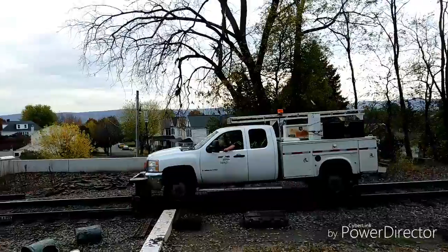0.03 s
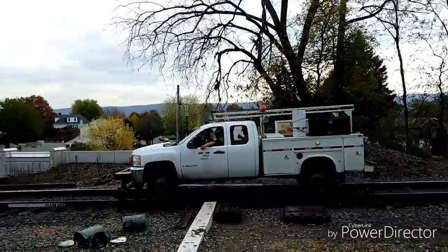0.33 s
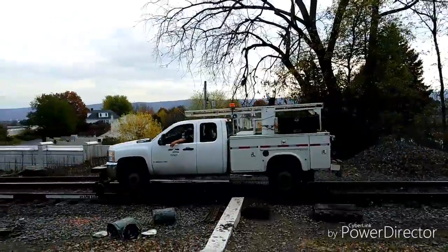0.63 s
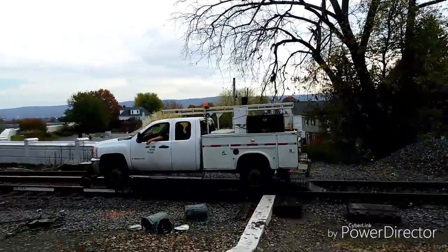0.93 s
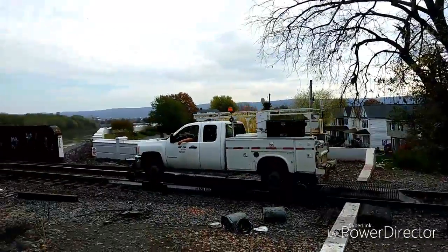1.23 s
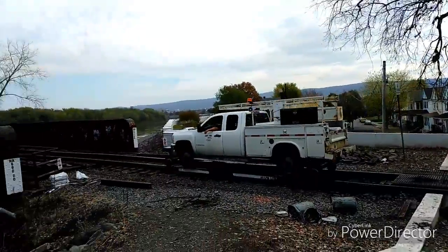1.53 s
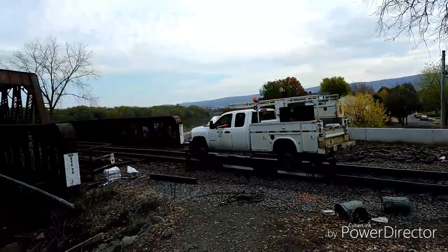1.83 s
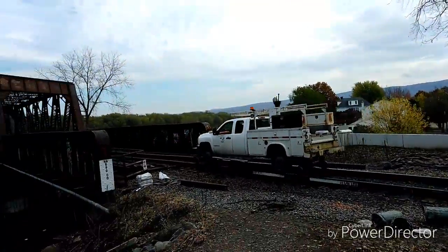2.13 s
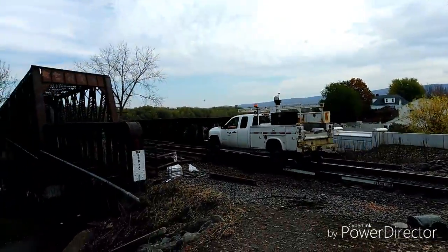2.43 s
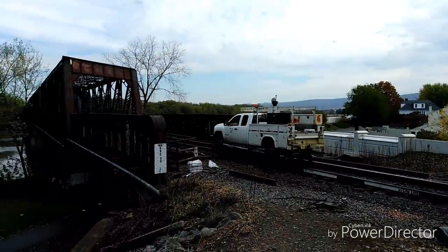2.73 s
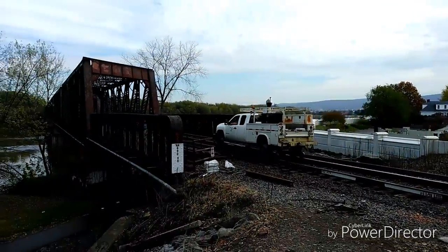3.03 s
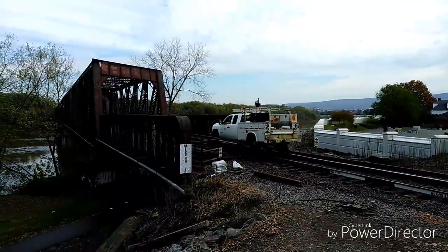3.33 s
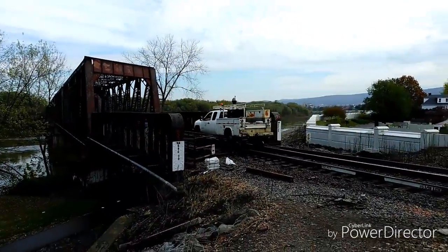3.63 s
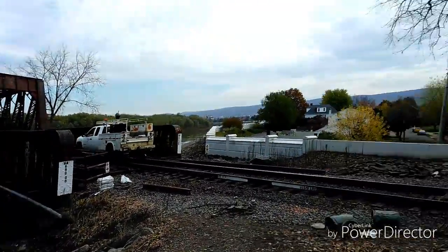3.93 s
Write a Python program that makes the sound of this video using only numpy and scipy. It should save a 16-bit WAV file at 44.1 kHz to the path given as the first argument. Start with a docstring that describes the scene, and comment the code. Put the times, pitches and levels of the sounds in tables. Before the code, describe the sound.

Outdoors, a truck on rails passes to the microphone's left with a low rumble, hiss and metallic ringing. Its wheels clank over joints, squeal briefly and grind, while the body knocks and loose gear rattles before it fades away.

```python
"""A pickup truck on small steel guide wheels rolls past along a railway track and away towards a bridge.
Engine pulses and tyres rumble; the rough rail drives a roar, a hiss and the wheels' resonant modes.
Impacts at rail joints clank and ring, the chassis knocks and booms, loose gear rattles, and the wheels
squeal and grind. The truck is to the left of two microphone ports, nearly opposed in phase in the bass."""
import sys
import numpy as np
from scipy import signal
from scipy.fft import rfft, irfft, next_fast_len
from scipy.io import wavfile
from scipy.ndimage import uniform_filter1d, map_coordinates

SR = 44100
rng = np.random.default_rng(int(sys.argv[2]) if len(sys.argv) > 2 else 0)


def inscribe(sig):
    """Save sig as 16-bit PCM at rate SR to the path in sys.argv[1].

    A 1-D sig is mono; a 2-D sig holds one channel per row.
    Samples are clipped to [-1, 1] before scaling.
    """
    pcm = np.round(np.clip(np.atleast_2d(sig).T, -1, 1) * 32767)
    wavfile.write(sys.argv[1], SR, pcm.astype(np.int16))


N = 176400
TIME = np.arange(N) / SR
CONTACT_S, SWELL_DB = 0.0027, 3.8  # hold of an impact; depth of a mode's random swells


def amp(db):
    """Decibels as an amplitude ratio."""
    return 10 ** (np.asarray(db) / 20)

def unit(x):
    """Normalisation to an rms of 1."""
    return x / np.sqrt(np.mean(x ** 2) + 1e-20)

def along(points, hz):
    """Interpolation on a logarithmic frequency axis."""
    f, values = np.transpose(points)
    return np.interp(np.log(hz + 1), np.log(f + 1), values)

def curve(rows):
    """Linear interpolation in time."""
    return np.interp(TIME, *np.transpose(rows))

def wobble(rate):
    """Smooth random modulation with rate knots a second."""
    coarse = TIME[::16]
    knots = rng.standard_normal(len(coarse))
    return np.interp(TIME, coarse, map_coordinates(knots, [coarse * rate + 2], order=2))

def flutter(rate, depth_db):
    """Random amplitude modulation of rms 1."""
    return unit(amp(depth_db * wobble(rate)))

def filtered(x, response):
    """Linear filtering by a complex frequency response."""
    size = next_fast_len(N + SR // 2)
    return irfft(rfft(x, size) * response(np.fft.rfftfreq(size, 1 / SR)), size)[..., :N]

def noise(spectrum, patchy_db=0):
    """Two uncorrelated coloured noises; patchy_db adds narrow resonances that come and go."""
    frames = signal.stft(rng.standard_normal((2, N)), nperseg=1024)[2]
    patches = uniform_filter1d(rng.standard_normal(frames.shape[1:]), size=2, axis=0)
    patches = uniform_filter1d(patches, size=16, axis=1)
    pair = signal.istft(frames * amp(patchy_db * unit(patches)), nperseg=1024)[1][:, :N]
    return unit(filtered(pair, lambda hz: amp(along(spectrum, hz))))

def mode(hz, width_hz):
    """A randomly driven resonance: narrow-band noise over two paths."""
    sway = np.array([wobble(1.3 * width_hz) + 1j * wobble(1.3 * width_hz) for _ in range(2)])
    carrier = np.exp(2j * np.pi * np.cumsum(hz * np.ones(N)) / SR)
    return unit((sway * carrier).real)

def tone(hz, drift_hz):
    """A partial under random frequency modulation, with its own phase in each of two paths."""
    phase = 2 * np.pi * np.cumsum(hz + drift_hz * wobble(60)) / SR
    return np.sqrt(2) * np.sin(phase + rng.uniform(0, 2 * np.pi, (2, 1)))

def blow(start_s, rise_s, t60_s):
    """Envelope of a damped impact: linear rise, short hold, exponential decay."""
    age = TIME - start_s
    attack = np.clip(age / max(rise_s, 1e-4), 0, 1)
    return attack * amp(-60 * np.maximum(age - rise_s - CONTACT_S, 0) / t60_s)

def swell(peak_s, half_s):
    """Symmetric envelope, 12 dB down at half_s either side of its peak."""
    return 1 / (1 + ((TIME - peak_s) / half_s) ** 2) ** 2


# Loudness of engine and tyres. Each row: time in seconds, level in dB.
ENGINE_LEVEL = [(0, -26), (.7, -30), (1.4, -35), (2.8, -34), (3.3, -29), (4, -39)]
# Exhaust spectrum. Each row: frequency in Hz, relative level in dB.
EXHAUST_SPECTRUM = [(26, -46), (42, -14), (85, 1), (130, -11), (200, -5), (1000, -52.5)]
def engine(firing_hz=85.7, pulse_db=-18.5):
    """Source and filter: the exhaust shapes uneven firing pulses, over the deep rumble of the tyres."""
    firings = np.cumsum(firing_hz * (1 + 0.058 * wobble(5.4))) / SR
    pulses = np.diff(np.floor(firings), prepend=0) * flutter(90, depth_db=5)
    note = unit(filtered(pulses - pulses.mean(), lambda hz: amp(along(EXHAUST_SPECTRUM, hz))))
    return amp(curve(ENGINE_LEVEL)) * unit(noise(EXHAUST_SPECTRUM) + amp(pulse_db) * note)


# Loudness of the roar. Each row: time in seconds, level in dB.
ROAR_LEVEL = [(0, -27.5), (.95, -28), (1.7, -24.5), (2.15, -29), (2.65, -26), (3.1, -31.5), (3.6, -33),
              (4, -43)]
# Its spectrum. Each row: frequency in Hz, relative level in dB.
ROAR_SPECTRUM = [(60, -73), (190, -6.5), (365, 3), (700, -3), (1100, -9), (1900, -18), (2500, -30.5),
                 (3700, -45), (8000, -71)]
def rolling_roar():
    """Forced vibration: the rough rail shakes the truck over a broad band."""
    return amp(curve(ROAR_LEVEL)) * noise(ROAR_SPECTRUM, patchy_db=4)


# Loudness of the singing. Each row: time in seconds, level in dB.
SING_LEVEL = [(0, -33), (.72, -27.5), (1.12, -33.5), (1.6, -31.5), (2.55, -33.5), (2.75, -36),
              (3.45, -37.5), (4, -58)]
# Wheel modes. Each row: frequency in Hz, relative level in dB, dB per second as the truck turns away.
WHEEL_MODES = [(674, -13, 1.5), (1417, -10, 3.34), (1587, 2.5, -1), (1798, -7.5, 0), (3038, -14, 0.75),
               (4547, -12, -3.5), (5177, -26.5, 4), (6060, -36, 6.5), (7120, -15, -2)]
def wheel_singing(sag_per_s=0.012):
    """Resonance: the rail excites each wheel mode, whose pitch sinks as the truck recedes."""
    modes = 0
    for hz, db, slope in WHEEL_MODES:
        width_hz = 55 + .034 * hz  # rail contact damps the higher modes more
        ring = mode(hz * (1 - sag_per_s * TIME), width_hz)
        modes += amp(db + slope * TIME) * ring * flutter(20, SWELL_DB)
    return amp(curve(SING_LEVEL)) * unit(modes)


# Loudness of the hiss. Each row: time in seconds, level in dB.
HISS_LEVEL = [(0, -33), (.65, -31.5), (1.08, -36), (1.8, -32.5), (2.3, -44), (3.4, -50.5), (4, -61)]
# Spectra of the hiss and its finest sizzle. Each row: frequency in Hz, relative level in dB.
HISS_SPECTRUM = [(1500, 8), (2600, 0), (3700, -10.5), (4700, -6.5), (6100, -15), (8200, 0), (11500, 3),
                 (12800, -1.5), (15500, -47)]
SIZZLE_SPECTRUM = [(9000, -32), (13500, 2)]
def flange_hiss(grit_per_s=90):
    """Friction noise: steel slides on steel, and grit on the rail modulates the hiss."""
    level_db = curve(HISS_LEVEL)
    hiss = amp(level_db) * noise(HISS_SPECTRUM, patchy_db=3) * flutter(grit_per_s, depth_db=1.5)
    sizzle = amp(10.5 + 1.75 * level_db) * noise(SIZZLE_SPECTRUM)  # fades faster with distance
    return hiss + sizzle


# Drops of the suspension. Each row: start in seconds, level in dB.
SPRING_THUMPS = [(.03, -20), (1.51, -20.5), (1.708, -21), (1.878, -18.5), (2.988, -20)]
# Their spectrum. Each row: frequency in Hz, relative level in dB.
SPRING_SPECTRUM = [(28, -43), (55, -3.5), (105, -7.5), (200, -10), (600, -84)]
def suspension_thumps():
    """Damped vibration: the springs take a drop with a deep, slowly dying thump."""
    envelope = sum(amp(db) * blow(start, rise_s=0.0037, t60_s=0.77) for start, db in SPRING_THUMPS)
    return envelope * noise(SPRING_SPECTRUM)


# Knocks in the frame. Each row: start in seconds, level in dB.
FRAME_KNOCKS = [(0.144, -18), (1.275, -18.5), (1.347, -18), (1.419, -15.5), (2.238, -18.5), (2.395, -14),
                (2.553, -14), (2.916, -19), (3.531, -24)]
# Their spectrum. Each row: frequency in Hz, relative level in dB.
FRAME_SPECTRUM = [(60, -10.5), (240, 1.5), (620, 3), (1000, -8.5), (1400, -3.5), (2600, -28), (16000, -108)]
def chassis_knocks():
    """Soft impact: a slow contact carries little treble, so the frame sounds dull and hollow."""
    envelope = sum(amp(db) * blow(start, rise_s=.005, t60_s=.16) for start, db in FRAME_KNOCKS)
    return envelope * noise(FRAME_SPECTRUM)


# Wheel impacts. Each row: start and rise in seconds, then body, clank and crash levels in dB.
JOINT_IMPACTS = [(0.245, 0.016, -9.5, -17.5, -25.5), (0.392, 0.00042, -17, -19, -18),
                 (0.536, 0.0047, -13.5, -21, -19), (1.509, 0.003, -13, -23, -30.5),
                 (1.541, 0.0023, -24, -26, -33), (1.656, 0.002, -11.5, -19.5, -16.5),
                 (1.856, 0.02, -14.5, -20, -25.5), (2.953, 0.013, -15, -16, -28),
                 (3.067, 0.0028, -24.5, -30, -41.5), (3.213, 0.019, -26.5, -25.5, -22.5)]
# Spectra of truck body, wheel clank and steel crash. Each row: frequency in Hz, relative level in dB.
BODY_SPECTRUM = [(40, -36), (110, 4), (210, -5), (520, -1.5), (700, -4), (3000, -60)]
CLANK_SPECTRUM = [(400, -25), (900, -2), (1400, 7.5), (2000, 0), (2500, -13), (3050, -3.5), (8000, -101)]
CRASH_SPECTRUM = [(1500, 10), (2600, -4.5), (4700, -0.5), (6200, -2.5), (8600, 0.5), (11200, 6),
                  (12600, 2.5), (15500, -33)]
# Modes of struck steel. Each row: frequency in Hz, relative level in dB.
STEEL_MODES = [(3120, 3.5), (4420, -1.5), (8554, 11), (11150, 2), (11515, 13), (12720, 10)]
def rail_joints(tail_db=-7, ring_db=-8.5, snap_db=4.5):
    """Impact excitation: a wheel drops into a gap; the body booms, the wheel clanks and steel rings."""
    body, clank, crash, ring, snap = np.zeros((5, N))
    for start, rise_s, body_db, clank_db, crash_db in JOINT_IMPACTS:
        body += amp(body_db) * blow(start, rise_s + 0.0023, t60_s=0.23)
        clank += amp(clank_db) * blow(start, rise_s / 2, t60_s=0.23)
        scrape = blow(start, rise_s, t60_s=0.075 + 14 * rise_s)  # a slow contact scrapes on
        crash += amp(crash_db) * (scrape + amp(tail_db) * blow(start, rise_s, t60_s=0.52))
        ring += amp(crash_db + ring_db) * blow(start, rise_s, t60_s=0.59)
        sharpness = np.exp(-rise_s / CONTACT_S)  # a quick contact snaps
        snap += amp(crash_db + snap_db) * sharpness * blow(start + rise_s / 2, 0, t60_s=0.06)
    steel = unit(sum(amp(db) * mode(hz, width_hz=45) for hz, db in STEEL_MODES))
    low = body * noise(BODY_SPECTRUM, patchy_db=5.5) + clank * noise(CLANK_SPECTRUM, patchy_db=5)
    bright = (crash + rattle_envelope()) * noise(CRASH_SPECTRUM, patchy_db=7)
    return low + bright + snap * rng.standard_normal((2, N)) + ring * steel


# Squeals. Each row: peak time and half-width in seconds, frequency in Hz, level in dB.
WHEEL_SQUEALS = [(0.686, 0.023, 1512, -29), (0.786, 0.037, 1552, -24.5), (1.041, 0.026, 1542, -22.5),
                 (1.31, 0.14, 11500, -36), (3.3, 0.074, 11946, -31)]
def wheel_squeals():
    """Single-mode resonance: one mode of a wheel swells briefly into a nearly pure tone."""
    return sum(amp(db) * swell(peak, half) * tone(hz, drift_hz=18.5) * flutter(88.8, SWELL_DB)
               for peak, half, hz, db in WHEEL_SQUEALS)


# Grinds. Each row: peak time and half-width in seconds, frequency and bandwidth in Hz,
# glide in Hz per second, level in dB.
FLANGE_GRINDS = [(1.34, 0.38, 806.5, 421, -150, -27), (2.103, 0.46, 3090, 210.3, -330, -40)]
def flange_grinds():
    """Sliding friction: a flange rubs the rail in a rough band of noise that sinks in pitch."""
    sound = 0
    for peak, half, hz, width_hz, glide, db in FLANGE_GRINDS:
        band = mode(hz + glide * (TIME - peak), width_hz)
        sound += amp(db) * swell(peak, half) * band * flutter(20, SWELL_DB)
    return sound


# Booms. Each row: start in seconds, frequency in Hz, level in dB, 60 dB decay time in seconds.
PANEL_BOOMS = [(1.273, 345, -18, .17), (1.717, 115, -9, 0.065), (2.958, 388, -19, 0.13),
               (2.985, 106, -23.5, 0.55), (3.217, 245.7, -13, 0.043), (3.262, 172, -21, 0.081)]
def panel_booms():
    """Free vibration: each body panel rings down at its natural frequency."""
    return sum(amp(db) * blow(start, .007, t60_s) * tone(hz, drift_hz=18.02)
               for start, hz, db, t60_s in PANEL_BOOMS)


# Rattles of the load. Each row: start in seconds, level in dB.
GEAR_RATTLES = [(1.909, -32), (2.894, -37.5), (3.26, -38.5)]
def rattle_envelope():
    """Exponential decay: loose gear shakes on after a joint and prolongs the crash of steel."""
    return sum(amp(db) * blow(start, rise_s=0.0022, t60_s=1) for start, db in GEAR_RATTLES)


# Level difference of the ports. Each row: frequency in Hz, left over right in dB.
PORT_BALANCE = [(200, 3), (750, 4.5), (1250, 9), (2300, 5), (3000, 0), (6300, 2.5), (8200, 7.5),
                (11000, 23), (15000, 20)]
# Their likeness. Each row: frequency in Hz, coherence from 0 to 1.
PORT_COHERENCE = [(30, 0.78), (90, 0.93), (400, 0.96), (1100, 0.57), (3000, 0.27), (6000, 0.03)]
# Their phase difference. Each row: frequency in Hz, lead of the left in radians.
PORT_LEAD = [(100, -3), (450, -2.5), (850, -2.5), (1200, -2), (1550, 2.5), (2100, 1), (3000, 1.2)]
def microphone_ports(pair):
    """Partial coherence: the left hears one path; the right, a weaker, phase-shifted mix of both."""
    def right(hz):
        coherence = np.clip(along(PORT_COHERENCE, hz), 0, 1)
        shared = coherence * np.exp(-1j * along(PORT_LEAD, hz))
        return amp(-along(PORT_BALANCE, hz)) * np.array([shared, np.sqrt(1 - coherence ** 2)])
    return np.array([pair[0], filtered(pair, right).sum(axis=0)])


def scene():
    """Superposition: all the truck's sounds add and arrive from the same side."""
    rolling = engine() + rolling_roar() + wheel_singing() + flange_hiss()
    impacts = suspension_thumps() + chassis_knocks() + rail_joints()
    return microphone_ports(rolling + impacts + wheel_squeals() + flange_grinds() + panel_booms())


def record(dry, top_hz=15900):
    """Saturation and band limiting: peaks round off at full scale and nothing passes above top_hz."""
    limited = dry / (1 + dry ** 6) ** (1 / 6)
    return filtered(limited, lambda hz: hz < top_hz)


dry = scene()
out = record(dry)
inscribe(out)
```